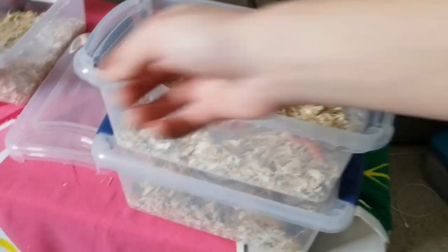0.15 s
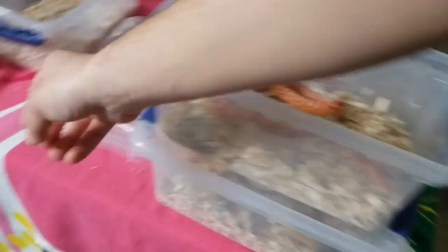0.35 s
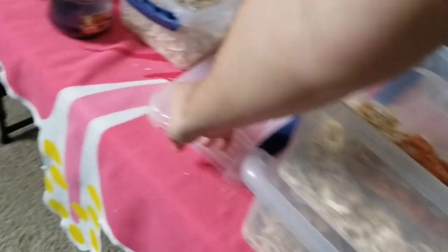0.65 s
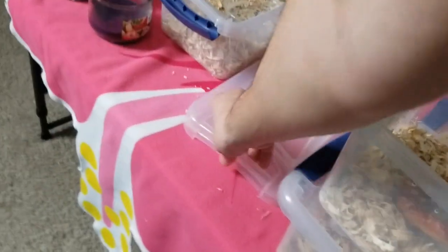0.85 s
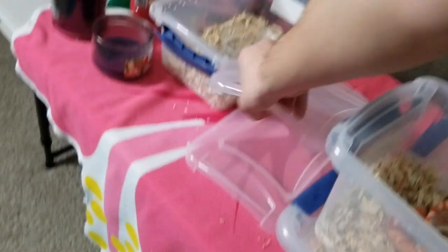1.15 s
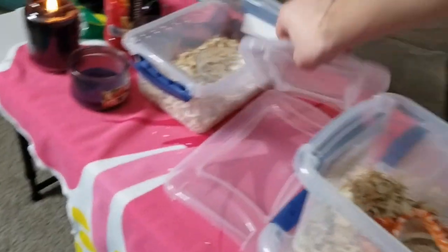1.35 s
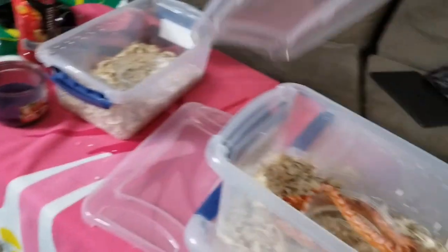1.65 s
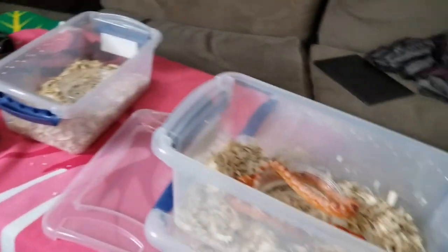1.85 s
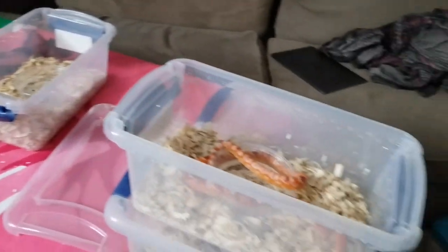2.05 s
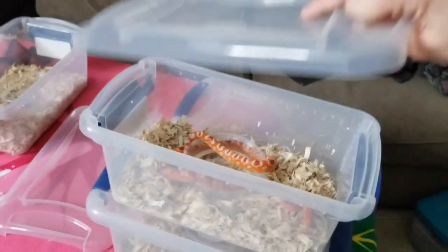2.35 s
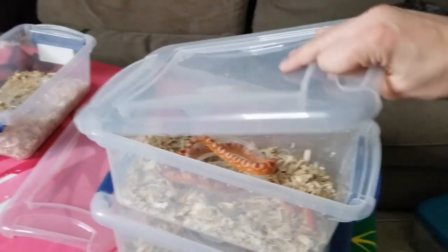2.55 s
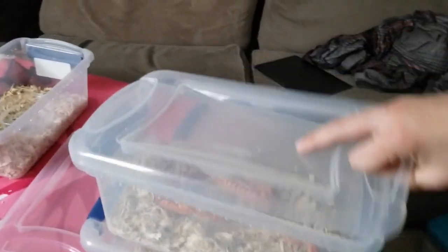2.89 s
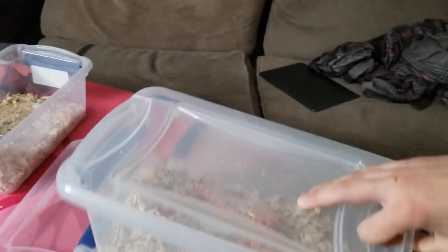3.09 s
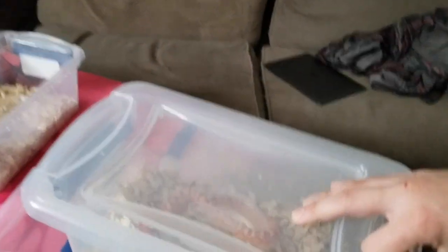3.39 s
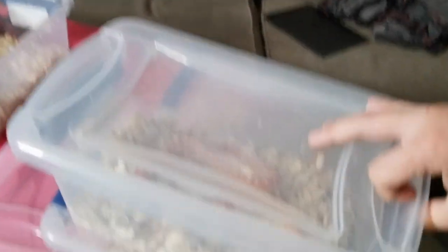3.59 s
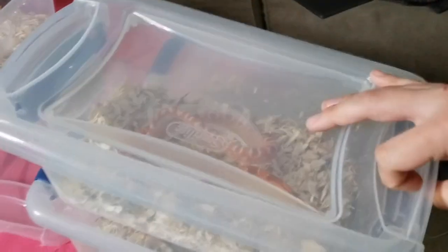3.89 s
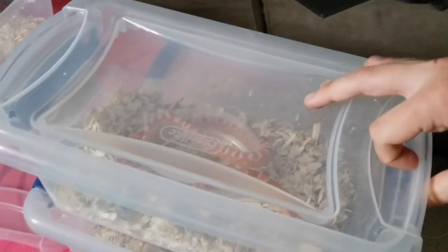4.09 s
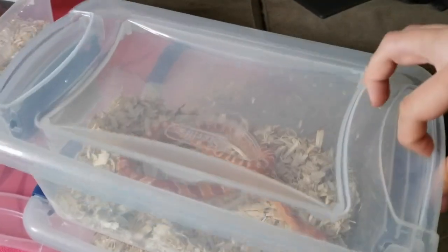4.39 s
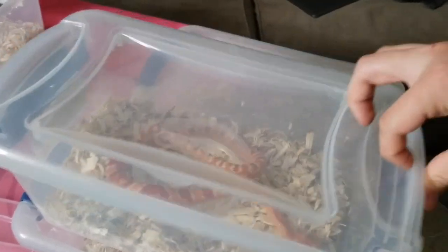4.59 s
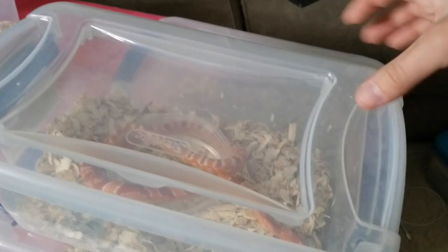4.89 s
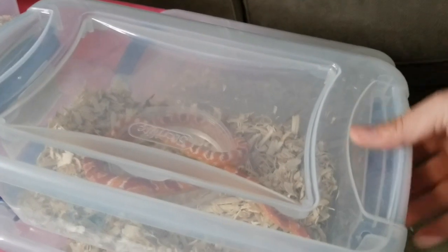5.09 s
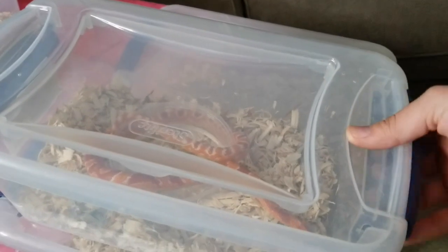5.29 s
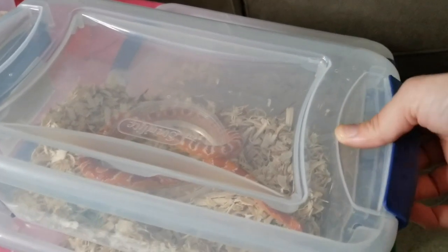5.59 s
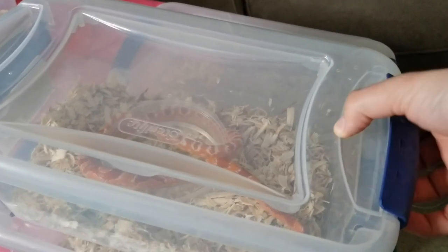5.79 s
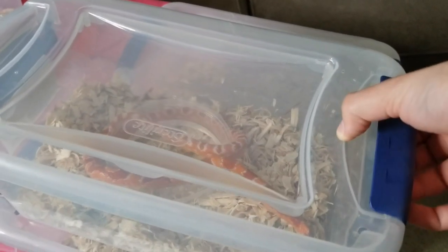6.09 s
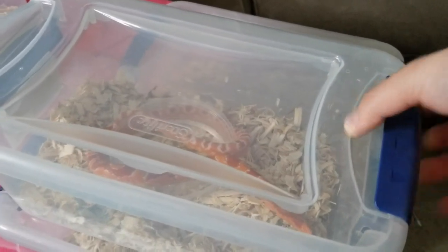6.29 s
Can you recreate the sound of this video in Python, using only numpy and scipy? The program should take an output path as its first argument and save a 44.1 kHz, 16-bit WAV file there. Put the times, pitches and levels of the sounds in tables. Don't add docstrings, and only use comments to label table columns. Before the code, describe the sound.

Close stereo pickup in a small furnished room with a faint steady fan hum. Fingers rustle and knock lightly on plastic, a lid clacks off a covered table, then a quieter pause with tiny ticks. The lid lands on a hollow tub with sharp clacks, is pressed home in a cluster of boxy knocks and pops, and a latch clicks, ending in one very loud crack.

```python
import sys
import numpy as np
from scipy import signal
from scipy.fft import rfft, irfft
from scipy.io import wavfile
from scipy.ndimage import uniform_filter1d

SR = 44100
rng = np.random.default_rng(int(sys.argv[2]) if len(sys.argv) > 2 else 0)


def log_audio(samples):
    frames = np.atleast_2d(samples).T
    limited = np.clip(frames, -1, 1)
    pcm = np.round(limited * 32767).astype(np.int16)
    wavfile.write(sys.argv[1], SR, pcm)


def convert_level_to_amplitude(level_db):
    exponent = np.asarray(level_db, float) / 20
    return 10 ** exponent


N = 284180
ONSET = .003
PRE_ROLL = 64

# (centre_hz, level_db_per_hz)
TICK_TONE = [(3500, 0.5), (5200, 9.5), (7200, 9.5), (8800, -9), (10000, -3.5), (13000, -13), (15500, -58),
             (17000, -63)]
# (centre_hz, likeness_0_to_1)
PORT_LIKENESS = [(30, 0.96), (300, 0.96), (700, 0.093), (1500, 0.025), (4000, 0.017), (16000, 0.054)]


def evened(x):
    return x / np.sqrt(np.mean(x ** 2) + 1e-20)


def read(points, hz):
    f, value = np.transpose(points)
    return np.interp(np.log(hz + 1), np.log(f + 1), value)


def add(mix, s, sound):
    part = mix[..., round(s * SR):][..., :sound.shape[-1]]
    part += sound[..., :part.shape[-1]]


def noise(tone, same, patchy_db, size=512):
    frames = 4 * N // size + 5
    hz = np.fft.rfftfreq(size, 1 / SR)
    a, b, c, d, patches = rng.standard_normal((frames, len(hz), 5)).T
    patches = uniform_filter1d(patches, size=8, axis=0)
    patches = evened(uniform_filter1d(patches, size=10, axis=1))
    same = np.clip(read(same, hz), -1, 1)[:, None]
    left, other = a + 1j * b, c + 1j * d
    z = np.array([left, same * left + np.sqrt(1 - same ** 2) * other])
    z *= convert_level_to_amplitude(read(tone, hz)[:, None] + patchy_db * patches)
    return evened(signal.istft(z, nperseg=size, noverlap=3 * size // 4)[1][:, :N])


def ring(modes, t, spread_db, detune, rise):
    hz, db, t60 = np.transpose(modes)[:, :, None]
    luck = rng.standard_normal((3, len(modes), 1))
    waves = np.sin(2 * np.pi * hz * (1 + detune * luck[0]) * t + .35 * luck[2])
    dying = convert_level_to_amplitude(db + spread_db * luck[1] - 60 * t / t60)
    sound = (dying * waves).sum(0) * (1 - np.exp(-t / rise))
    return sound / abs(sound).max()


def burst(tone, t, t60, tail_db, tail_t60, snap):
    head, left, right = rng.standard_normal((len(t), 3)).T
    grit = (head + 0.75 * np.array([left, -left])) * convert_level_to_amplitude(-60 * t / t60) + snap * (t == 0)
    grit += (0.66 * head + np.array([left, right])) * convert_level_to_amplitude(tail_db - 60 * t / tail_t60)
    z = rfft(np.roll(grit, PRE_ROLL, axis=1)) * convert_level_to_amplitude(read(tone, np.fft.rfftfreq(len(t), 1 / SR)))
    sound = irfft(z, len(t))
    return sound / abs(sound).max()


def ports(sound, s, pan_db=0):
    # (time_s, lag_samples)
    lags = [(0, 1.7), (1.5, 3.6), (3, 2.6), (4.5, 10.5), (6.4, 6.3)]
    # (centre_hz, left_right_db)
    shadow = [(60, -1.5), (300, -2.8), (600, -2), (1300, -6), (2600, -1), (5000, -4), (9000, -9),
              (14000, -7)]
    bass_hz = 71
    size = sound.shape[-1]
    hz = np.fft.rfftfreq(size, 1 / SR)
    lag = np.interp(s, *np.transpose(lags)) / SR
    half = convert_level_to_amplitude((read(shadow, hz) + pan_db) / 2)
    way = np.array([half * np.exp(-2j * np.pi * hz * lag), 1 / half])
    way = way / np.sqrt(1 + (bass_hz / (hz + 1)) ** 8)
    fade_out = np.clip(np.arange(size)[::-1] / 600 - 1, 0, 1)
    return irfft(rfft(sound) * way, size) * fade_out


def fan():
    # (centre_hz, level_db_per_hz)
    hum_tone = [(12, -28), (20, -8.5), (105, 2.5), (273, -6.5), (583, -13), (994, -27.5), (1180, -22),
                (1350, -34.5), (2510, -22.5), (3140, -39), (7100, -33), (8890, -45), (12100, -34),
                (15500, -34.5), (16000, -70)]
    # (middle_s, half_width_s, level_db)
    gusts = [(0.02, 0.4, -72.5), (.2, 0.026, -70), (.3, 0.023, -63), (.4, .035, -61.5), (.5, 0.034, -71.5),
             (.95, 0.3, -74), (1.62, 0.054, -70.5), (1.78, 0.033, -62), (1.89, .03, -60.5),
             (2.2, 0.039, -71.5), (2.5, 0.59, -70.5), (3.72, 0.19, -69.5), (4.17, 0.045, -65),
             (4.285, 0.011, -57.5), (4.3, .05, -63), (5.46, 0.07, -61.5), (5.64, 0.037, -65),
             (5.8, 0.094, -71.5), (6.28, 0.2, -75.5)]
    t = np.arange(N) / SR
    hum = convert_level_to_amplitude(-53) * noise(hum_tone, PORT_LIKENESS, patchy_db=1.0, size=2048) * convert_level_to_amplitude([[-.8], [.8]])
    band = [(1950, -21), (2240, -12), (2340, -3.5), (2420, -7), (2510, -2.0), (2620, -14), (2900, -33)]
    band = [(20, -90)] + band + [(9000, -90)]
    whistle = noise(band, [(2000, .4), (3000, .4)], patchy_db=3.0, size=1024)
    draught = convert_level_to_amplitude(-95)
    for s, width, db in gusts:
        draught = draught + convert_level_to_amplitude(db) * np.exp(-.5 * ((t - s) / width) ** 2)
    wander_hz = 1.5 * evened(uniform_filter1d(rng.standard_normal(N), size=2000))
    whine = np.sin(2 * np.pi * np.cumsum(1187 + wander_hz) / SR)
    return hum + draught * whistle + convert_level_to_amplitude(-75.5) * whine


def knocks():
    # (pitch_hz, level_db, t60_s)
    walls = [(87, -21, 0.25), (158.5, -12, 0.1), (226.4, -7, 0.045), (292, -4, 0.069), (353.4, -6.5, 0.12),
             (442.4, -5.5, 0.057), (510.5, -3.5, 0.048), (591, -6, 0.072)]
    rim_modes = [(714, -2, 0.065), (759, -10.5, 0.075), (821, -4.5, 0.082), (913, 6, 0.011),
                 (1051, 0.5, 0.033), (1158, 5, 0.021), (1360, -17, 0.038)]
    # (centre_hz, level_db_per_hz)
    crack_tone = [(900, -64), (1400, 0.5), (1950, 0), (2500, -2), (3000, -6.5), (4600, -13), (6000, -35)]
    rattle_tone = [(400, -3), (650, -22), (900, 10.5), (1300, -14), (1800, -6), (2600, -36)]
    # (start_s, blow_db, panel_pitch_hz, rim_share_db, tick_share_db)
    blows = [(0.702, -30, 110, -9, -5), (1.118, -19, 412, -3.5, -2.5), (1.1344, -20.5, 136, -8, -3),
             (2.521, -19, 139, -6, -7), (2.6929, -28, 102, -14, 0), (3.062, -14, 344, -11.5, -14.5),
             (3.781, -20, 358, -4, -11.5), (4.398, -15, 435, -15, -16), (4.4116, -12.5, 333, -4.5, -8.5),
             (4.5291, -17, 355, -10, -8.5), (4.581, -12, 322, -6, -11), (5.348, -25, 307, -49, -12),
             (5.988, -30.5, 194, -3, -8), (5.9982, -12.5, 323, -0.5, -9.5)]
    # (start_s, blow_db, panel_pitch_hz, rim_share_db, crack_share_db)
    clacks = [(0.562, -31.5, 104, -1.5, 5.5), (0.777, -41.5, 135, -2, -2), (0.919, -40.5, 282, -12, 1),
              (0.989, -32.5, 123.6, 0.5, -5.5), (1.399, -54, 114, 7.5, 9), (1.448, -56, 120.2, 8.5, 17),
              (2.5125, -15.5, 436, -13, -3.5), (2.959, -16.5, 480, -7, -5.5), (2.991, -12.5, 397, -12, -7),
              (3.054, -18, 406, -19, -8), (3.374, -44.5, 250, -6.5, 0), (3.768, -24.5, 294, -13, -15),
              (3.867, -28, 350, -7.5, -10), (4.344, -41, 124, -14, -1), (5.156, -32, 159, -7, -11),
              (5.235, -27.5, 460, -30, -5), (5.2405, -16.5, 302, -5.5, -7), (5.61, -28.5, 151, -15, -10)]
    # (start_s, blow_db, panel_pitch_hz, rim_share_db)
    presses = [(0.813, -32.5, 266, -24), (0.8435, -16.5, 379, -22), (0.866, -23, 288, -15),
               (1.472, -47, 130, -37), (2.933, -34.5, 277, -25), (3.522, -25.5, 285, -14.5),
               (3.741, -30.5, 253, -18), (3.8, -28, 328, -33), (3.84, -34.5, 269, -14),
               (3.938, -34, 307, -7.5), (3.9632, -33, 263, -11.5), (4.009, -33.5, 117, -35),
               (4.207, -43.5, 120, -35), (4.298, -35, 340, -41), (4.31, -30.5, 368, -32),
               (4.424, -24, 292, -17.5), (4.555, -20.5, 347, -10), (5.068, -38, 230, -36),
               (5.13, -28, 333, -54), (5.146, -35, 330, -2.5), (5.167, -31, 314, -31),
               (5.408, -44, 308, -27)]
    grazes = [
        (1.0, -47, 320, -3, 6),
        (4.567, -22, 340, -3.5, -5),
        (1.1245, -25, 210, -1, -2),
        (3.037, -33, 310, -4, 0),
        (1.106, -41, 310, -3, 2),
    ]

    hard = [(s, db, hz, rim, -4 + 0.027 * rim, tick) for s, db, hz, rim, tick in blows]
    flat = [(*row, -17 + .7 * row[-1]) for row in clacks]
    light = [(*row, -9) for row in grazes]
    soft = [(*row, -9.5 + 0.32 * row[-1], -24) for row in presses]

    out, t = np.zeros((2, N)), np.arange(8192) / SR
    for s, db, hz, rim_db, crack_db, tick_db in sorted(hard + flat + soft) + light:
        near = [(f, level - 1.2 * abs(np.log2(f / hz)), t60) for f, level, t60 in walls]
        body = ring(near + [(hz, 6, .04)], t, spread_db=5.0, detune=0.036, rise=0.0017)
        rim = convert_level_to_amplitude(rim_db) * ring(rim_modes, t, spread_db=5.0, detune=0.034, rise=0.00069)
        crack = convert_level_to_amplitude(crack_db) * burst(crack_tone, t, t60=0.012, tail_db=-10.5, tail_t60=0.17, snap=5.05)
        tick = convert_level_to_amplitude(tick_db) * burst(TICK_TONE, t, t60=0.013, tail_db=-17.0, tail_t60=0.25, snap=3.8)
        rattle = burst(rattle_tone, t, t60=0.0084, tail_db=-11.5, tail_t60=0.14, snap=4.2)
        rattle = convert_level_to_amplitude(rim_db - 7.0) * rattle
        blow = np.roll(.8 * body + rim, PRE_ROLL) + rattle + crack + tick
        add(out, s + ONSET - PRE_ROLL / SR, ports(convert_level_to_amplitude(db) * blow, s))
    return out


def pings():
    # (start_s, peak_db,
    # pitch_hz, t60_s)
    patch_rings = [(0.564, -38, 1950, 0.021), (0.563, -45, 1310, 0.035), (0.78, -42, 1790, .02),
                   (0.888, -32, 293, 0.2), (0.992, -36.5, 898, 0.021), (1.1208, -14, 1220, 0.0087),
                   (1.126, -17, 760, 0.011), (1.137, -23, 1820, 0.018), (1.141, -31, 213, 0.14),
                   (1.402, -40.5, 1820, 0.024), (1.451, -38.5, 1890, .02), (2.5149, -5.5, 437, 0.02),
                   (2.515, -27, 142.7, 0.28), (2.515, -18.5, 2250, 0.01), (2.5224, -11.5, 307, 0.029),
                   (2.756, -38, 12600, .004), (2.767, -36, 11500, .004), (2.793, -46, 3480, .008),
                   (2.962, -31, 5200, 0.0045), (2.9935, -19, 4690, 0.0066), (3.038, -30, 2550, 0.016),
                   (3.064, -21, 640, .012), (3.064, -25, 151, .15), (3.0673, -11, 336, 0.053),
                   (3.784, -19, 2010, 0.013), (3.7886, -20, 341, 0.14), (3.9645, -25, 260, 0.026),
                   (4.402, -30, 85.5, 0.21), (4.414, -10, 2606, 0.015), (4.414, -9, 965, 0.024),
                   (4.414, -11, 345, 0.08), (4.4237, -11.5, 338, 0.032), (4.543, -22, 513, 0.035),
                   (4.557, -31, 1800, .01), (4.5685, -14, 710, 0.011), (4.584, -18.5, 4240, 0.0045),
                   (4.5846, -24.5, 3250, 0.024), (4.582, -12, 502, 0.02), (5.146, -43, 2500, .008),
                   (5.157, -44.5, 3480, 0.0061), (5.3508, -19, 300, 0.07), (6.0009, -2, 910, .011),
                   (6.0005, -6, 313, 0.051), (6.0008, -15, 825, 0.05), (6.0015, -16, 1900, 0.031),
                   (6.0015, -18, 7100, 0.0059), (6.002, -32, 152, 0.15), (6.0019, -16, 490, 0.035),
                   (6.002, -36, 3400, 0.026), (6.001, -31, 4360, .008),
                   (0.564, -34, 2800, .008), (.705, -42, 3500, .006), (.708, -38, 700, .012),
                  (.766, -48, 3800, .005), (0.8455, -22, 600, 0.0076), (0.846, -40, 2000, 0.005),
                  (.868, -36, 1890, .008), (.872, -25.5, 298, 0.056), (.993, -40, 1800, .008),
                  (1.003, -46, 2900, .006), (1.109, -33, 2900, 0.0066), (1.1215, -15, 1900, 0.0054),
                  (1.1217, -20, 3000, 0.0054), (1.1197, -28, 5500, .005), (1.137, -19, 3000, .005),
                  (2.516, -24, 1100, .004), (2.523, -24, 1500, .006), (2.962, -23, 1300, .006),
                  (2.9935, -24, 5900, .005), (3.056, -32, 5000, .005), (3.0645, -19, 2400, .005),
                  (3.0654, -15, 1300, 0.0056), (3.069, -20, 440, 0.013), (3.088, -30, 2600, .006),
                  (3.769, -32, 1500, 0.0065), (3.9645, -34, 1000, .006), (4.211, -37, 210, 0.032),
                  (4.309, -30, 420, .02), (4.347, -46, 2500, .008), (4.4025, -18, 430, .025),
                  (4.415, -14, 1700, 0.0047), (4.428, -33, 3900, .006), (4.531, -22, 6000, .005),
                  (4.557, -36, 3600, .005), (4.569, -24, 2000, .005), (4.5838, -24.5, 9500, 0.0034),
                  (5.237, -34, 3900, .006), (5.2515, -20, 400, .02), (5.613, -40, 2270, .015),
                  (5.612, -36, 7100, 0.0094), (5.915, -50, 1200, .008), (5.993, -22, 300, 0.037),
                  (6.0015, -26, 4700, .006), (6.0015, -24, 3800, .006), (6.012, -30, 2500, .015),
                  (6.015, -34, 4300, .008)]
    rise_cycles = 0.39
    room_cycles = 17.5
    out, spread, t = np.zeros((2, N)), np.zeros(N), np.arange(12000) / SR
    for s, db, hz, t60 in patch_rings:
        rise = 1 - np.exp(-t * hz / rise_cycles)
        swing = np.sin(2 * np.pi * hz * t) * rise * convert_level_to_amplitude(db - 60 * t / t60)
        speed = ports(np.gradient(swing) * SR / (2 * np.pi * hz), s)
        add(out, s, speed)
        add(spread, s, speed.mean(0) * convert_level_to_amplitude(-0.5 - 60 * t * hz / room_cycles))
    return out, spread


def pressure():
    # (start_s, length_s, hiss_db, shuffle_db)
    drags = [(.58, 0.097, -65.5, -50.5), (.715, 0.18, -62.5, -47.5), (.88, 0.063, -67.5, -54),
             (1.0, 0.037, -68, -61), (1.14, .11, -59, -50), (1.25, 0.2, -66, -56), (1.44, 0.3, -68, -60.5),
             (1.79, 0.083, -54, -56.5), (2.72, 0.088, -60.5, -49), (2.798, 0.046, -53, -50.5),
             (2.998, .055, -59, -55), (3.295, 0.42, -70.5, -54.5), (3.86, 0.27, -66, -59),
             (4.29, 0.055, -70, -48), (4.59, .12, -58, -52), (4.835, 0.088, -65, -74),
             (5.14, 0.04, -85, -43), (5.25, 0.12, -57.5, -49), (5.355, 0.082, -84, -50.5),
             (5.65, 0.22, -67, -66), (6.01, .12, -63, -52)]
    slides = [(.68, 0.031, -61, -41.5), (1.05, 0.15, -63.5, -48), (1.85, 0.079, -61.5, -56.5),
              (1.94, 0.34, -68.5, -61.5), (2.4, 0.24, -62, -57), (2.811, 0.15, -53.5, -47.5),
              (3.721, 0.14, -63, -44), (4.159, 0.067, -68, -67), (4.34, 0.069, -63, -56),
              (5.19, 0.059, -61, -60), (5.571, 0.07, -56.5, -54.5), (6.155, 0.09, -59.5, -51)]
    grip_s, ease_db = 0.0067, -6.5
    gains = np.zeros((3, N))
    for rows in (drags, slides):
        for s, length, hiss_db, low_db in rows:
            u = np.arange(1, round(length * SR)) / (length * SR)
            if rows is drags:
                shape = np.minimum(np.minimum(u, 1 - u) * length / grip_s, 1) * convert_level_to_amplitude(ease_db * u)
            else:
                shape = np.sin(np.pi * u) ** 1.34
            fizz = convert_level_to_amplitude(1.87 * (hiss_db + 54.5) - 57.5) * shape
            add(gains, s, np.array([convert_level_to_amplitude(hiss_db) * shape, fizz, convert_level_to_amplitude(low_db) * shape]))
    return gains


def rubs():
    # (centre_hz, level_db_per_hz)
    hiss_tone = [(710, -50), (1200, -13), (1650, -1), (2980, -1), (3390, 3), (4980, -2.5), (7300, 6),
                 (9180, -25), (13000, -6), (16400, -30)]
    fizz_tone = [(6000, -37), (9000, -0.5), (10500, 1), (13000, -1), (15500, 0), (16000, -31)]
    shuffle_tone = [(47, -29), (80, -8.5), (333, 3.5), (457, -33), (584, -7), (1050, -17), (2500, -22),
                    (3250, -49), (5500, -120)]
    hiss_gain, fizz_gain, low_gain = pressure()
    flutter = convert_level_to_amplitude(1.8 * evened(uniform_filter1d(rng.standard_normal(N), size=300)))
    hiss = noise(hiss_tone, [(1000, 0.076), (9000, 0.048)], patchy_db=2.5, size=256) * convert_level_to_amplitude([[-3], [2.5]])
    fizz = noise(fizz_tone, [(1000, .4), (9000, 0.26)], patchy_db=-2.0, size=256) * convert_level_to_amplitude([[-4], [3]])
    low = noise(shuffle_tone, [(100, 1.0), (2000, 0.095)], patchy_db=3) * convert_level_to_amplitude([[-1.4], [1.4]])
    return flutter * (hiss_gain * hiss + fizz_gain * fizz + low_gain * low)


def thuds():
    # (start_s, peak_db, pitch_hz, t60_s)
    pushes = [(1.121, -22, 146.3, 0.19), (1.2, -32, 140, 0.14), (1.471, -27, 127, 0.14),
              (2.515, -56, 133, 0.16), (2.957, -29.5, 147, 0.21), (2.992, -22, 163, 0.11),
              (3.057, -36, 149, 0.17), (3.781, -29, 124.3, 0.22), (3.963, -26, 127, 0.084),
              (4.295, -35.5, 126, 0.093), (4.404, -24, 185.3, 0.21), (4.529, -29.5, 140.7, 0.23),
              (4.583, -25.5, 168, 0.088), (4.648, -34.5, 125, 0.089), (4.718, -58, 173.4, 0.14),
              (5.123, -32, 176.6, 0.2), (5.235, -26, 161, 0.092)]
    out, t = np.zeros((2, N)), np.arange(12000) / SR
    for s, db, hz, t60 in pushes:
        modes = [(hz, 0, t60), (0.61 * hz, -4, t60), (1.472 * hz, -7, t60)]
        push = ring(modes, t, spread_db=3.5, detune=0.021, rise=0.0024)
        add(out, s, ports(convert_level_to_amplitude(db - 0.5) * push, s))
    return out


def ticks():
    # (start_s, peak_db, centre_hz, left_right_db)
    edge_ticks = [
        (1.7895, -34, 14000, 9),
        (1.8617, -47, 5350, 20),
        (1.8808, -38, 6600, -10),
        (2.7554, -67.5, 13100, -18),
        (2.766, -47, 12900, 0),
        (3.2795, -53, 6970, -20),
        (3.2914, -35, 5260, -18),
        (3.3303, -62, 5250, -2),
        (4.8464, -52, 7050, 1),
        (5.915, -61, 5190, 17),
    ]
    hard_snaps = [
        (5.235, -32, 5400, -3),
        (5.2415, -21, 13000, -25),
        (5.2425, -25, 22000, -27),
        (2.9927, -19, 3500, -17),
        (2.514, -24, 10000, 13.5),
        (3.4, -45, 15000, 2),
        (2.755, -37, 21000, -6),
    ]
    out, t = np.zeros((2, N)), np.arange(4096) / SR
    for s, db, hz, pan_db in list(edge_ticks) + list(hard_snaps):
        tone = [(f, level - 4 * abs(np.log2(f / hz))) for f, level in TICK_TONE]
        click = burst(tone, t, t60=0.0052, tail_db=-27, tail_t60=0.052, snap=2.94)
        add(out, s + ONSET / 2 - PRE_ROLL / SR, ports(convert_level_to_amplitude(db) * click, s, pan_db + 6))
    return out


def room(x):
    # (centre_hz, t60_s)
    decay = [(100, 0.51), (300, 0.4), (1000, 0.39), (2500, 0.42), (6000, 0.5), (14000, 0.19)]
    # (centre_hz, level_db)
    answer_tone = [(100, -9), (300, -10), (900, -7), (2500, -8.5), (6000, -9.5), (9000, -12), (15000, -6.5)]
    taps = np.zeros((2, SR))
    at = np.arange(220, SR - 20, 20) + rng.integers(0, 20, (2, (SR - 221) // 20))
    np.put_along_axis(taps, at, rng.choice([-1., 1.], at.shape), 1)
    hz, t, z = signal.stft(taps, SR, nperseg=256)
    same = np.clip(read(PORT_LIKENESS, hz), 0, 1)[:, None]
    z[1] = same * z[0] + np.sqrt(1 - same ** 2) * z[1]
    tail = signal.istft(z * convert_level_to_amplitude(-60 * t / read(decay, hz)[:, None]), SR, nperseg=256)[1]
    tail *= np.arange(tail.shape[1]) > 200
    z = rfft(tail / np.linalg.norm(tail[0]))
    tail = irfft(z * convert_level_to_amplitude(read(answer_tone, np.linspace(0, SR / 2, z.shape[1]))))
    return signal.fftconvolve(x[None], tail, axes=1)[:, :N]


def scene():
    near = knocks() + thuds() + ticks() + rubs()
    direct_pings, spread = pings()
    return near + direct_pings + room(near.mean(0) + spread) + fan()


def roll_off(x):
    return signal.sosfilt(signal.butter(12, 16830, fs=SR, output="sos"), x)


def record(dry):
    size = abs(dry)
    held = np.sign(dry) * np.where(size > .7, .7 + .29 * np.tanh((size - .7) / .29), size)
    held = signal.oaconvolve(held, signal.firwin(301, 16400, fs=SR)[None], "same")
    return roll_off(held)


dry = scene()
out = record(dry)
log_audio(out)
```